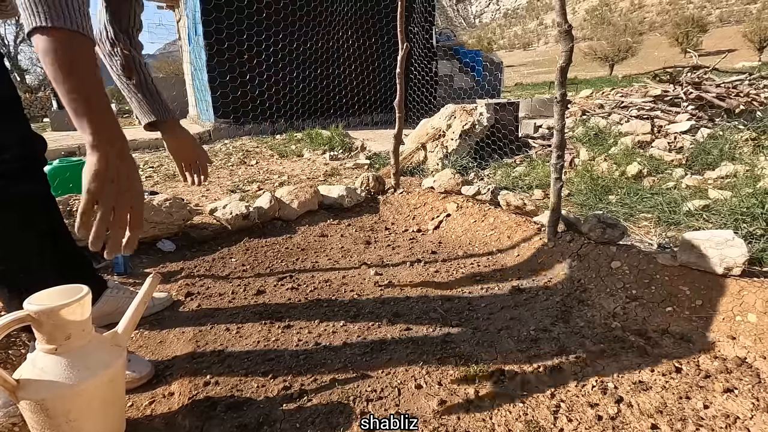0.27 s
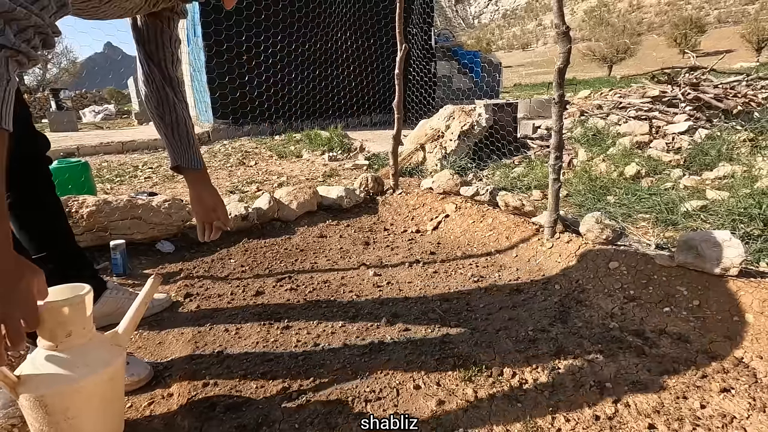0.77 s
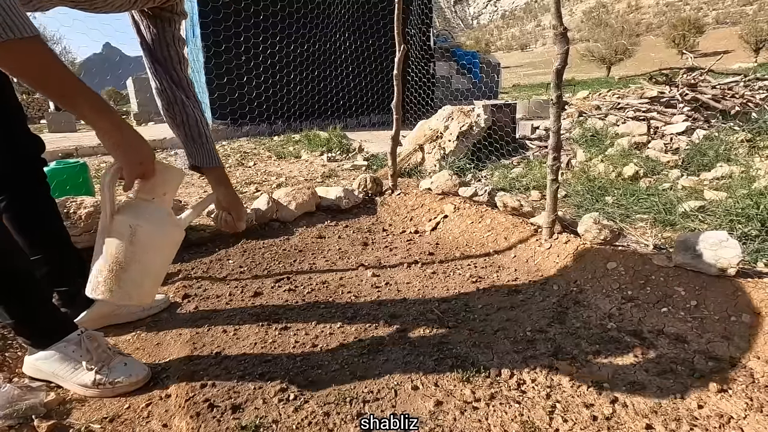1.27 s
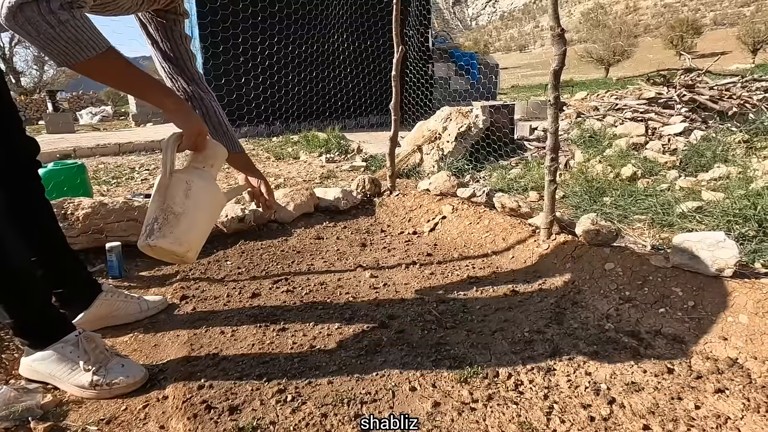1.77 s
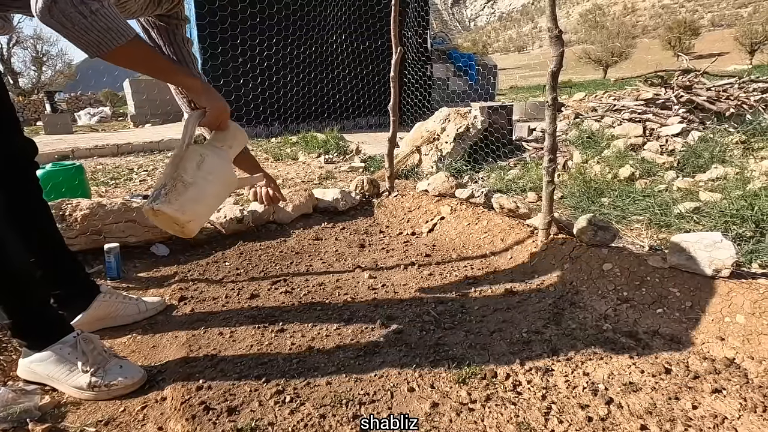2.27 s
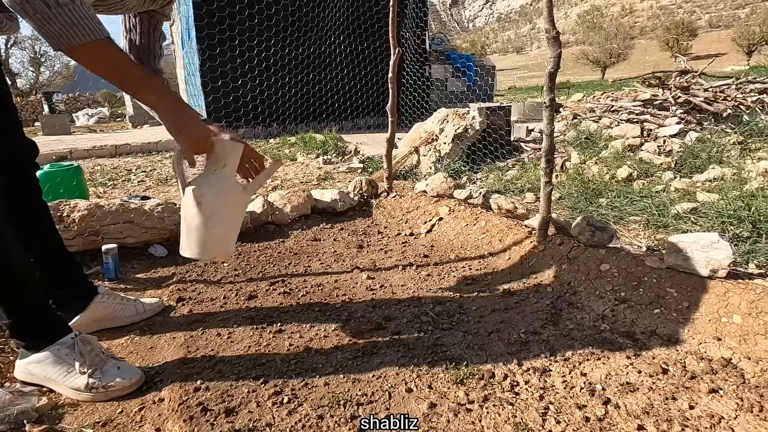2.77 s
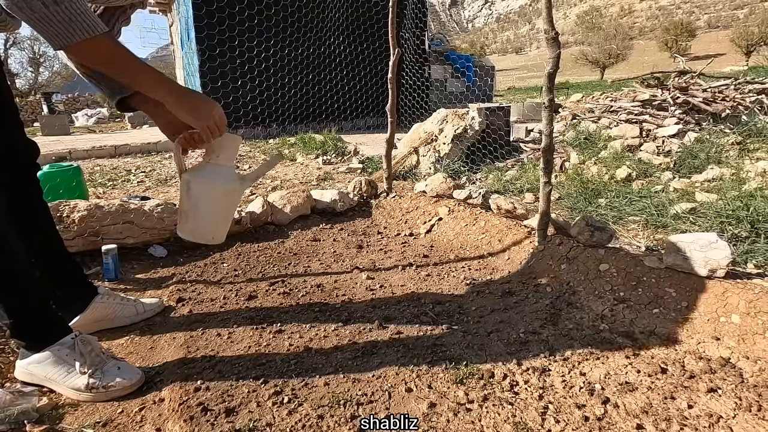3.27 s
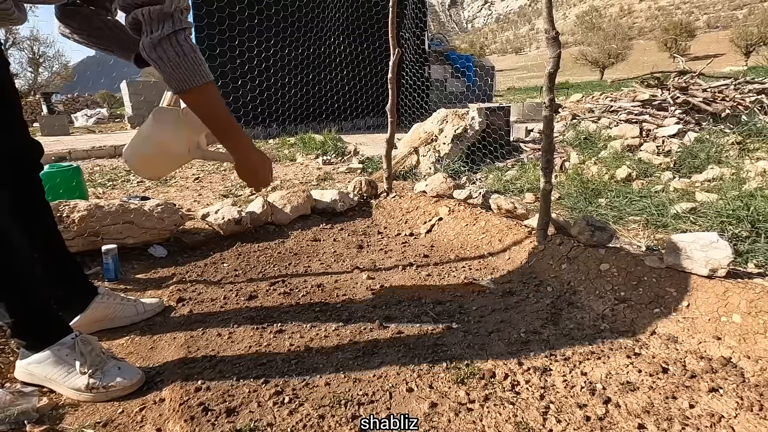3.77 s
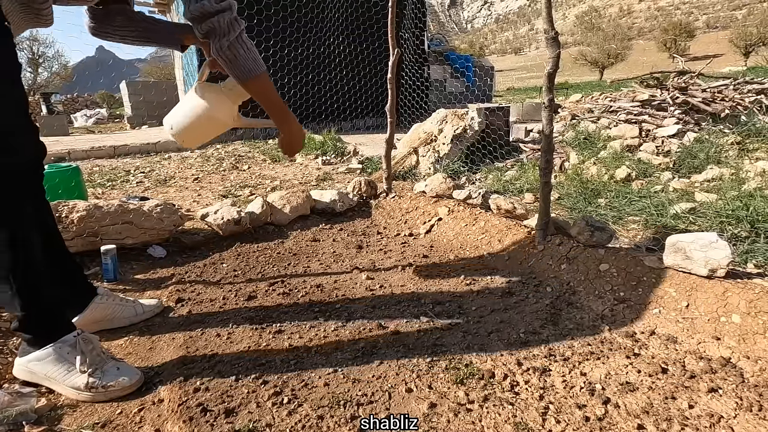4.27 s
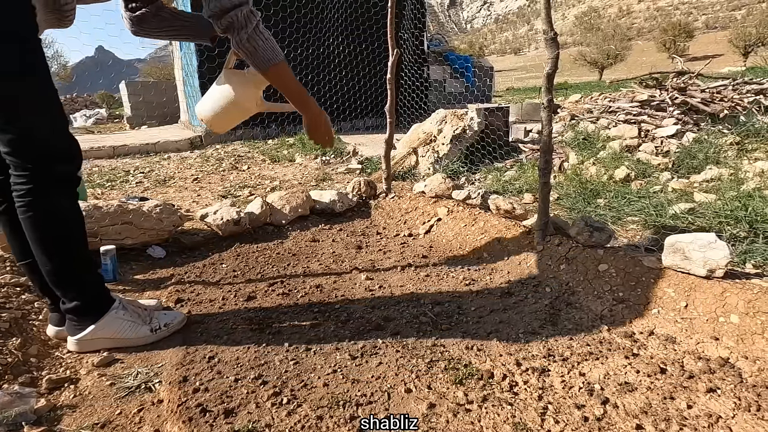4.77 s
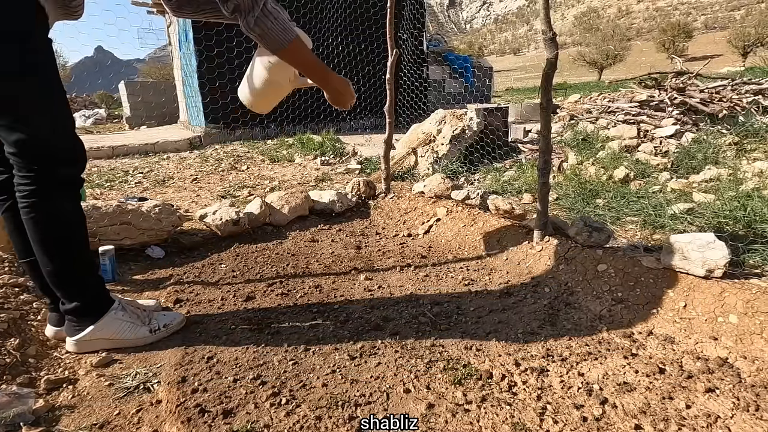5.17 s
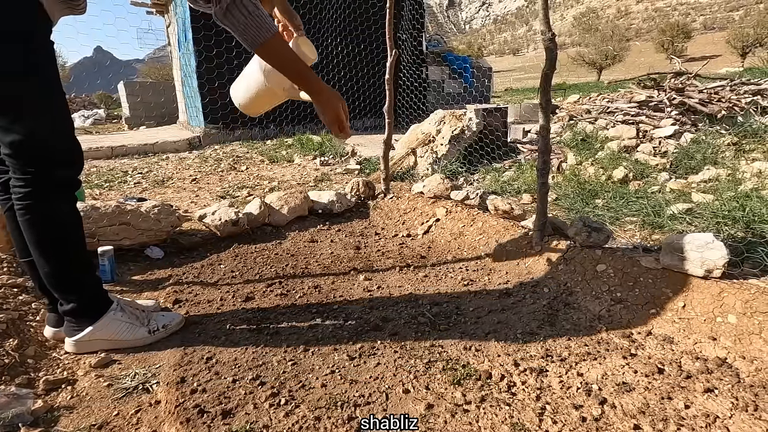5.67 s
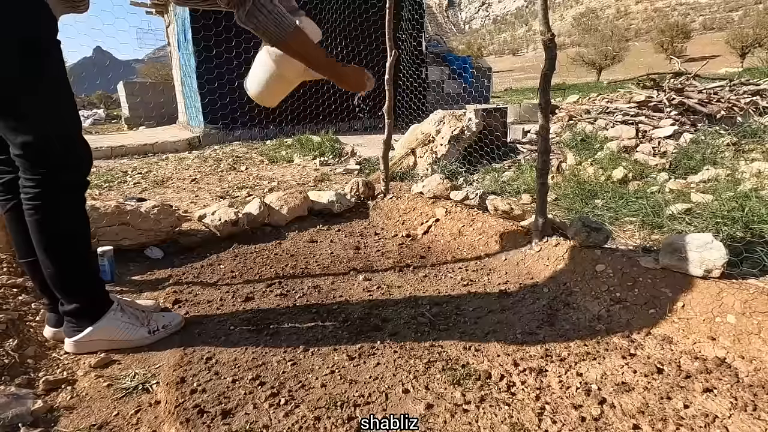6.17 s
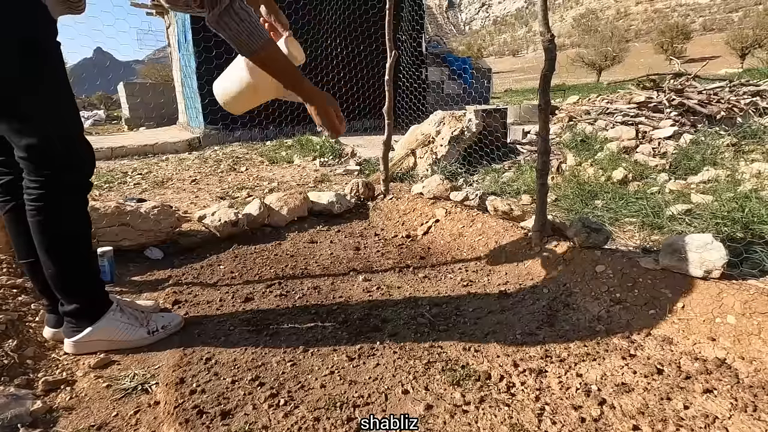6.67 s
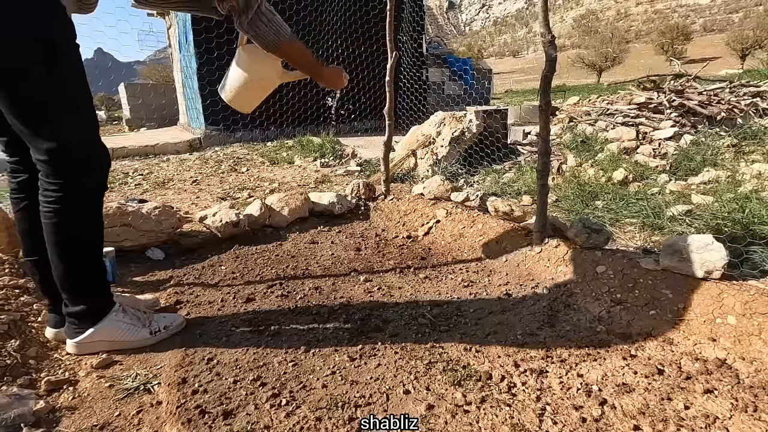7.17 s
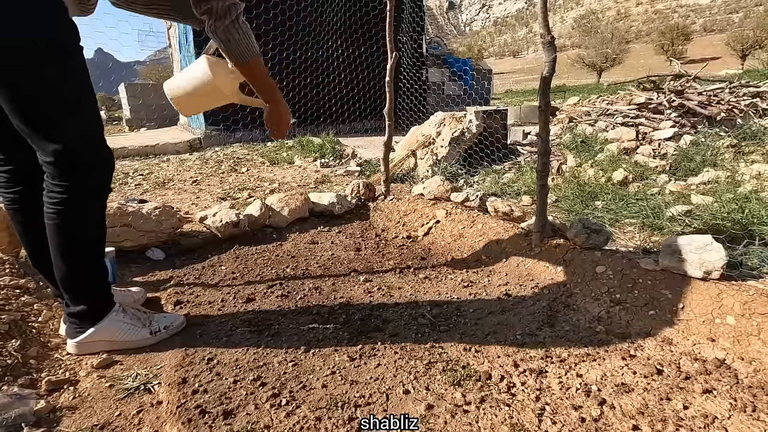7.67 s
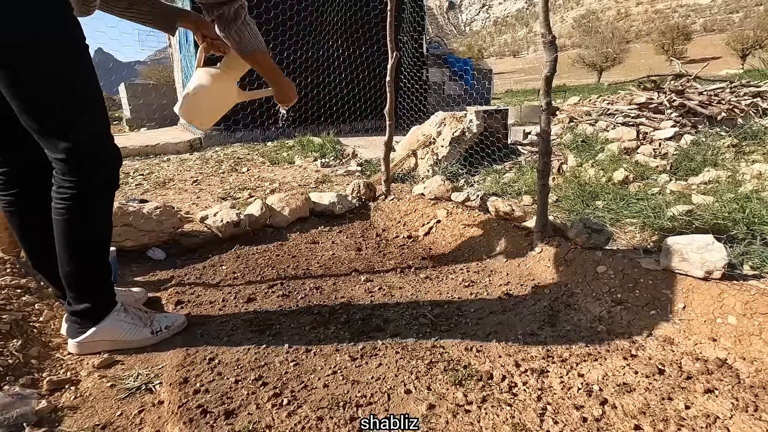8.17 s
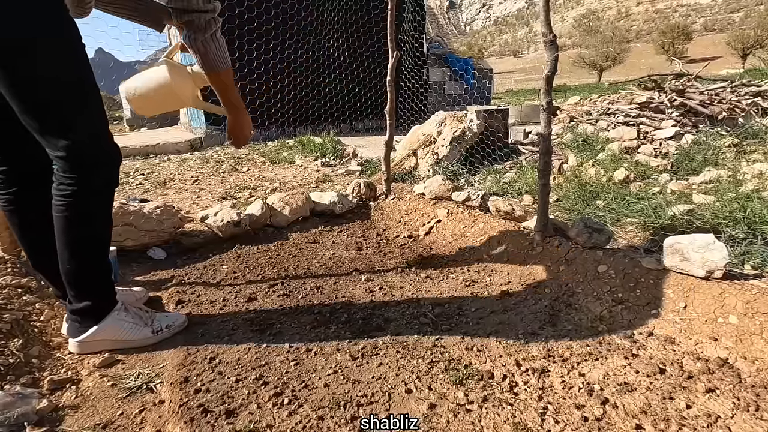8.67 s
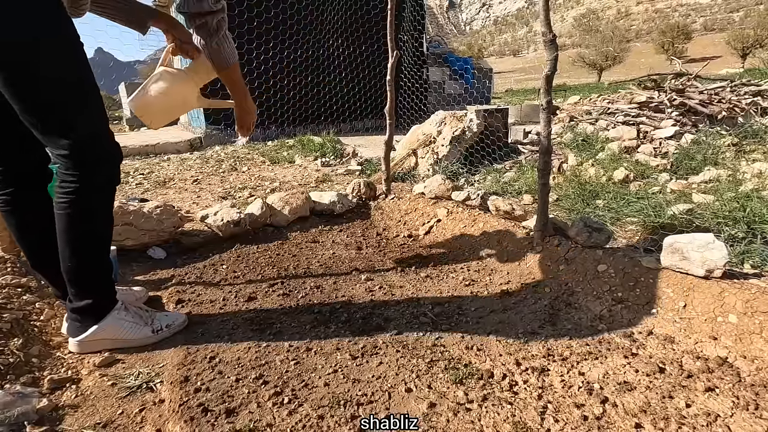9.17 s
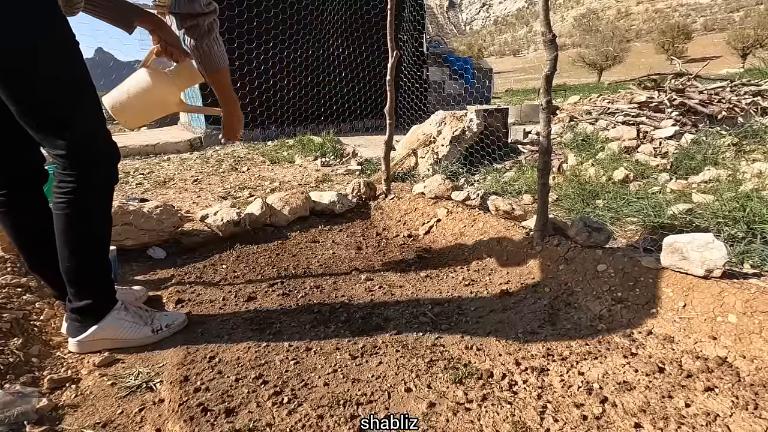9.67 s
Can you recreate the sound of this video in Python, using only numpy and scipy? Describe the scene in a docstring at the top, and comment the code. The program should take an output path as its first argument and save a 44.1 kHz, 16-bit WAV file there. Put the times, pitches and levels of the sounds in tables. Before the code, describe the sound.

Close outdoor take in a quiet yard. Cloth rustles as an arm reaches for a plastic watering can; a hollow knock and slosh come at three seconds, with a bright swish. Water then falls in uneven spurts on dry soil, pattering, pipping and crackling, with small gurgles in the spout. Low wind rumble buffets the microphone, stronger in the second half and slightly to the left.

```python
"""A quiet yard: a plastic watering can is picked up and tipped in spurts over dry, dug soil.
Droplets ring as bubbles, fat drops pip and crackle, and gurgles are swarms of rising tones.
Slaps and knocks are noise through the can's resonances; gulps are decaying hums of its air.
Sleeves rustle as uneven coloured noise, and gusts of wind rumble on the microphone."""
import sys
import numpy as np
from scipy import signal
from scipy.fft import rfft, irfft, next_fast_len
from scipy.io import wavfile
from scipy.ndimage import uniform_filter1d

SR = 44100
rng = np.random.default_rng(int(sys.argv[2]) if len(sys.argv) > 2 else 0)


def digitize_waveform(pressure):
    """Quantize a signal to 16-bit integers and store it at the path in sys.argv[1].

    Rows of a 2-D input are taken as channels; values are limited to [-1, 1].
    """
    field = np.atleast_2d(pressure).T
    bounded = np.clip(field, -1, 1)
    quanta = np.round(bounded * 32767).astype(np.int16)
    wavfile.write(sys.argv[1], SR, quanta)


N = 437913
TIME = np.arange(N) / SR


def from_db(db):
    """Amplitude gain is ten to the power of decibels over twenty."""
    return 10 ** (np.asarray(db) / 20)


def rms_one(x):
    """Dividing by the root mean square gives unit power."""
    return x / np.sqrt(np.mean(x ** 2) + 1e-20)


def peak_one(x):
    """Dividing by the largest excursion gives unit height."""
    return x / np.max(np.abs(x))


def decay(t, t60):
    """Exponential decay: the amplitude falls by 60 dB in t60 seconds."""
    return np.exp(-np.log(1000) * t / max(t60, 1e-4))


def burst(t, swell_s, t60):
    """Exponential build-up and decay: a quick swell that dies away."""
    return (1 - decay(t, swell_s)) * decay(t, t60)


def add(track, s, sound):
    """Superposition: mix a sound in at a time in seconds."""
    start = int(np.clip(round(s * SR), 0, N - 1))
    track[start:start + len(sound)] += sound[:N - start]


def drift(rate):
    """Twice low-passed noise: slow random wandering of unit power, with its corner at rate in Hz."""
    step = 40  # samples between the slow values
    r = np.exp(-2 * np.pi * rate * step / SR)
    settle = 2000
    white = rng.standard_normal(N // step + 2 + settle)
    slow = signal.lfilter([1], [1, -2 * r, r * r], white)[settle:]
    return np.interp(np.arange(N) / step, np.arange(len(slow)), rms_one(slow))


def strokes(rows, attack_s, release_s):
    """Powers add: each movement builds up, holds and dies away; short flicks start and stop sooner."""
    power = np.zeros(N)
    for s, length, db in rows:
        t = TIME[:int((length + release_s) * SR)]
        onset = 1 - decay(t, min(attack_s, 2 * length))
        ending = decay(np.maximum(t - length, 0), min(release_s, 5 * length))
        add(power, s, (from_db(db) * onset * ending) ** 2)
    return np.sqrt(power)


def at_hz(points, hz):
    """Interpolation on a log-frequency axis reads a spectrum."""
    knots, values = np.transpose(points)
    return np.interp(np.log(hz + 1), np.log(knots), values)


def colour(x, spectrum):
    """Folding the cepstrum forward gives the causal, minimum-phase filter of a spectrum."""
    size = 2 * next_fast_len(N // 2 + 4096, real=True)
    gain = from_db(at_hz(spectrum, np.fft.rfftfreq(size, 1 / SR)))
    cepstrum = irfft(np.log(gain))
    cepstrum[1:size // 2] *= 2
    cepstrum[size // 2 + 1:] = 0
    return irfft(rfft(x, size) * np.exp(rfft(cepstrum)))[..., :N]


def resonance(x, hz, width_hz):
    """A two-pole resonance rings at its pole frequency, with gain 1 on top."""
    r = np.exp(-np.pi * width_hz / SR)
    zeros = np.array([1, 0, -1]) * (1 - r * r) / 2
    poles = [1, -2 * r * np.cos(2 * np.pi * hz / SR), r * r]
    return signal.lfilter(zeros, poles, x + 1e-18)


def stereo(mid, side):
    """Interchannel correlation sets the share of side to mid: left and right differ most at the top."""
    # left-right likeness: frequency_hz, correlation
    likeness = [(60, .9), (250, .76), (700, .87), (2000, .86), (4500, .94), (8000, .84), (12000, .4)]
    width = [(hz, 10 * np.log10((1 - min(c, .99)) / (1 + c))) for hz, c in likeness]
    return mid + colour(side, width) * np.array([[1], [-1]])


def noise(spectrum):
    """Filtered white noise: coloured stereo noise of unit power."""
    mid, side = colour(rng.standard_normal((2, N)), spectrum)
    return rms_one(stereo(mid, side))


def pan(left_db):
    """Level difference between the ears: left over right, split evenly."""
    return from_db(np.array([[.5], [-.5]]) * left_db)


def scatter(x, near_db=-7.0, near_t60=0.044, far_db=-22.5, far_t60=0.23):
    """Diffuse reflection: clods and stones throw back a short smear, the wall a faint longer one."""
    t = TIME[:SR // 4]
    exponents = np.array([[1], [near_t60 / far_t60], [1]])
    near, far, wide = rng.standard_normal((3, len(t))) * decay(t, near_t60) ** exponents
    echo = from_db(near_db) * rms_one(near) + from_db(far_db) * rms_one(far)
    smears = np.array([echo, rms_one(wide)]) / np.sqrt(len(t))
    mid, side = signal.oaconvolve(x[None], smears, axes=1)[:, :N]
    return stereo(x + mid, side)


def yard():
    """Stationary background noise of fixed colour: the still yard."""
    # background spectrum: frequency_hz, relative level_db
    yard_colour = [(120, 1), (250, -7), (750, -23), (1200, -20.5), (3800, -35.5), (7500, -26), (15000, -28)]
    return from_db(-65.5) * noise(yard_colour)


def eddies(spectrum):
    """Turbulent noise divided by its own short-time level keeps an even strength."""
    x = noise(spectrum)
    return x / np.sqrt(uniform_filter1d(np.mean(x ** 2, axis=0), size=3500))


def gusts():
    """Powers add: each gust is a bell with long skirts on a wavering breeze; rumble, then buffeting."""
    # gusts on the microphone: crest_s, half_width_s, rumble level_db, buffeting level_db
    gust_rows = [(0.15, 0.04, -38, -54.5), (0.94, 0.052, -37.5, -49.5), (1.44, 0.019, -31, -47),
                 (1.89, 0.097, -32.5, -50), (2.079, 0.035, -31.5, -34.5), (2.72, 0.21, -41, -46),
                 (3.083, 0.048, -38.5, -33.5), (3.72, 0.081, -37, -49), (4.91, 0.019, -39, -40),
                 (5.48, 0.057, -26, -39), (5.708, 0.061, -25, -28), (6.139, 0.051, -28, -37.5),
                 (6.313, 0.056, -28, -26.5), (7.283, 0.074, -28.5, -37.5), (8.24, 0.077, -36, -42),
                 (8.476, 0.034, -23, -43.5), (9.28, 0.12, -35.5, -44), (9.529, 0.031, -21.5, -33)]
    rumble_db, buffet_db, waver_db = -46.5, -67.5, 2  # the air between gusts
    power = from_db(np.array([[rumble_db], [buffet_db]]) + waver_db * drift(9.7)) ** 2
    for s, width, *db in gust_rows:
        bell = 1 / np.cosh(np.minimum(np.abs(TIME - s) / width, 20))
        power = power + (from_db(db)[:, None] * bell) ** 2
    return np.sqrt(power)


def wind(lumpy_db=5.0, heave_db=2.0, left_db=-6.0):
    """Turbulence at the ports: slow eddies rumble, and faster, lumpy buffeting rises in sharp gusts."""
    # spectra of rumble and buffeting: frequency_hz, relative level_db
    wind_colour = [(25, 7.5), (40, 4), (65, -27.5), (110, -39), (300, -59), (600, -57.5), (4000, -100)]
    buffet_colour = [(25, 2.5), (65, 7), (110, -9.5), (170, -14), (300, -36.5), (600, -85.5)]
    rumble, buffet = gusts()
    lumps = rms_one(from_db(lumpy_db * np.minimum(drift(22.2), 2)))
    heaves = rms_one(from_db(heave_db * np.minimum(drift(12), 2)))
    low = heaves * rumble * eddies(wind_colour)
    high = lumps * buffet * eddies(buffet_colour)
    return (low + high) * pan(left_db)


def rustle(movement, spectrum, rough_db, gain_db, snags_per_s=600, snag_db=0.0, swell_db=2.0):
    """Friction: countless tiny contacts merge into an uneven hiss, with a rasp of snagging threads."""
    hiss, sizes = rng.standard_normal((2, N))
    snags = rms_one(sizes * (rng.random(N) < snags_per_s / SR))
    unevenness = from_db(rough_db * np.minimum(drift(80), 2) + swell_db * drift(22))
    contacts = (hiss + from_db(snag_db) * snags) * unevenness
    return from_db(gain_db) * movement * rms_one(colour(scatter(contacts, near_db=-12.0), spectrum))


def sleeve():
    """Rubbing friction of sleeve and hand as the arm reaches down, lifts the can and shifts its grip."""
    # rubs: start_s, length_s, level_db before the gain
    rubs = [(0.69, 0.06, -55), (0.752, 0.081, -50.5), (0.95, 0.064, -54), (1.18, 0.061, -63),
            (1.482, 0.019, -53.5), (1.873, 0.0079, -60.5), (3.05, 0.29, -65.5)]
    # spectrum: frequency_hz, relative level_db
    sleeve_colour = [(300, -7), (850, -16), (1400, -5.5), (3000, -4.5), (5300, -4), (8000, -8),
                     (14000, -11.5)]
    movement = strokes(rubs, attack_s=0.053, release_s=0.57)
    return rustle(movement, sleeve_colour, rough_db=0.5, gain_db=1.5)


def swish():
    """Friction noise of brighter colour: a hiss each time the arm swings forward or the can tips."""
    # swings: start_s, length_s, level_db before the gain
    swings = [(0.2, 0.013, -69.5), (1.59, 0.037, -74.5), (1.94, 0.096, -69.5), (2.18, 0.18, -69.5),
              (2.42, 0.15, -66), (3.245, 0.036, -48.5), (3.345, 0.14, -54), (3.54, 0.4, -63.5),
              (9.6, 0.14, -64.5)]
    # spectrum: frequency_hz, relative level_db
    swish_colour = [(300, -9), (800, -12.5), (1200, -9.5), (2800, -9.5), (4200, -4), (7300, 2.5),
                    (13000, -9.5)]
    movement = strokes(swings, attack_s=0.034, release_s=0.41)
    return rustle(movement, swish_colour, rough_db=1.5, gain_db=3.0)


def can_body(x):
    """Modal superposition: the half-full can's resonances, side by side."""
    # resonances of the can: frequency_hz, width_hz, level_db
    can_modes = [(459, 70, 4.5), (600, 52, 5.5), (678, 32, -1), (1027, 49, 0.5), (1152, 59, -3.5),
                 (1310, 180, -5), (1470, 28, -2), (1730, 95, -4), (1947, 240, -6), (2180, 25, 1.5),
                 (2870, 130, -11.5)]
    return sum(from_db(db) * resonance(x, hz, width) for hz, width, db in can_modes)


def knocks(contact_t60=0.0024, soften_hz=2600, chatter_db=-9.0, chatter_t60=.085, direct_db=-20.0):
    """Impact excitation: a sharp contact and a rattle of the grip leave the can's resonances ringing."""
    # the can knocked as the grip shifts: start_s, peak level_db
    knock_rows = [(0.029, -50.5), (0.428, -57.5), (2.975, -23), (3.034, -32), (3.109, -41.5),
                  (8.725, -54.5)]
    out, t = np.zeros(N), TIME[:SR // 4]
    soften = signal.butter(1, soften_hz, fs=SR, output="sos")
    for s, db in knock_rows:
        touch, chatter = rng.standard_normal((2, len(t)))
        rattle = chatter ** 3 / 10 * decay(t, chatter_t60)  # cubing leaves sparse spikes
        hit = touch * decay(t, contact_t60) + from_db(chatter_db) * rattle
        contact = signal.sosfilt(soften, hit)
        add(out, s, from_db(db) * peak_one(can_body(contact) + from_db(direct_db) * contact))
    return scatter(out, near_db=-22.0)


def gulps(swell_s=0.023, t60=0.52, gain_db=7.0, left_db=-2.0, usual_hz=200):
    """Air resonance: the air above the water hums like a bottle; smaller pockets bloop more briefly."""
    # gulps that set the air humming: start_s, level_db before swell and gain, pitch_hz
    gulp_rows = [(0.94, -56, 213.5), (2.495, -52, 191), (2.531, -43, 209.5), (2.974, -44, 227),
                 (3.037, -43, 225.5), (6.786, -57.5, 165), (6.899, -60, 202), (7.841, -60, 199.7),
                 (8.727, -52, 395), (9.214, -41, 194.2), (9.258, -46, 146.7)]
    out, t = np.zeros(N), TIME[:SR]
    for s, db, hz in gulp_rows:
        size = min(usual_hz / hz, 1) ** 2
        hum = np.sin(2 * np.pi * hz * t) * burst(t, swell_s * size, t60 * size)
        add(out, s, from_db(db + gain_db) * hum)
    return out * pan(left_db)


def slaps(wash_db=-5.0, spray_db=8.5, swell_s=0.0034, hard_db=-28.0, t60=0.089,
          wake_db=-17.0, wake_t60=0.21, gain_db=-0.5):
    """Forced resonance: water folds against the wall, a rush and its wake, with bright spray."""
    # water slapping the can's wall: start_s, level_db before the gain, centre_hz,
    # spray level_db relative to the slap before the spray gain
    slap_rows = [(1.491, -52, 1380, -11), (2.088, -50.5, 2300, -15), (2.526, -51.5, 870, -20),
                 (3.033, -33, 970, -6), (3.11, -42.5, 1360, -5), (3.158, -46.5, 1750, -27),
                 (3.406, -51.5, 370, -4), (3.652, -51.5, 1374, -5.5), (4.361, -40.5, 1570, -18),
                 (5.487, -53, 820, -8.5), (6.774, -39.5, 1000, -8.5), (7.532, -48, 770, -9.5),
                 (7.754, -51, 1010, -6), (8.173, -29.5, 1160, -32), (8.841, -53.5, 580, -27),
                 (9.182, -35, 2020, -21), (9.591, -45, 672, -13), (9.922, -45.5, 660, -25)]
    out, t = np.zeros(N), TIME[:SR // 3]
    treble = signal.butter(2, [2500, 9000], "band", fs=SR, output="sos")
    for s, db, hz, bright_db in slap_rows:
        swell = swell_s * np.sqrt(from_db(hard_db - db))  # gentle slaps build more slowly than hard ones
        shape = burst(t, swell, t60) + from_db(wake_db) * burst(t, swell, wake_t60)
        rush, spray = rng.standard_normal((2, len(t))) * shape
        pocket = signal.butter(2, [hz * .75, hz * 1.5], "band", fs=SR, output="sos")
        body = peak_one(signal.sosfilt(pocket, can_body(rush) + from_db(wash_db) * rush))
        bright = peak_one(signal.sosfilt(treble, spray))
        add(out, s, from_db(db + gain_db) * (body + from_db(bright_db + spray_db) * bright))
    return scatter(out, near_db=-18.0)


def bubbles(t60=0.022, rise_per_s=9.0, swell_s=0.006, swarm_db=-12.0, range_db=10.0,
            spread_s=0.045, octaves=0.9, froth_db=-8.0, count=22):
    """Bubble resonance: a big bubble rises in pitch amid a dense swarm of small ones and some froth."""
    # bubbles gurgling in the spout: start_s, level_db before the swell, pitch_hz
    bubble_rows = [(2.24, -50, 1960), (2.46, -50.5, 2130), (4.424, -43.5, 2260), (4.506, -42, 2330),
                   (4.604, -45, 2110), (4.694, -52, 2040), (4.744, -42.5, 2100), (4.882, -42, 3640),
                   (5.836, -47.5, 2630), (5.974, -49, 2700), (6.101, -51, 2850), (6.858, -43, 2340),
                   (6.894, -36.5, 3650), (6.912, -39.5, 2240), (6.938, -36, 2630), (7.94, -51.5, 4780)]
    out, t = np.zeros(N), TIME[:SR // 6]
    for s, db, hz in bubble_rows:
        froth = resonance(rng.standard_normal(len(t)) * burst(t, swell_s, 0.13), hz, hz)
        add(out, s, from_db(db + froth_db) * peak_one(froth))
        gurgle = [(0.0019, hz, 0)]  # the big bubble: delay_s, pitch_hz, relative level_db
        for when, size, weak in rng.random((count, 3)):
            pitch = hz * 2 ** (octaves * (size - .5))
            gurgle.append((spread_s * (2 * when - 1), pitch, swarm_db - weak * range_db))
        for late, pitch, size_db in gurgle:
            phase = 2 * np.pi * pitch * t * (1 + rise_per_s * t / 2)
            add(out, s + late, from_db(db + size_db) * np.sin(phase) * burst(t, swell_s, t60))
    return scatter(out, near_db=-16.0)


def splats(rise=0.16, crack_db=-2.0, crack_t60=0.01, crack_swell_s=0.0055, squelch_db=-24.5,
           squelch_periods=26.0, gain_db=-2.0):
    """Cavity and bubble resonance: a fat drop squelches upward, then a bubble pips in crackling spray."""
    # the fattest drops on the soil: impact_s, level_db before the gain, pitch_hz
    splat_rows = [(2.0883, -30, 5420), (2.6107, -34.5, 7800), (2.675, -28.5, 5300), (3.236, -27.5, 5120),
                  (4.565, -33.5, 8400), (4.7955, -36.5, 5700), (5.021, -22, 6450), (5.102, -34.5, 4650),
                  (5.127, -28, 2310), (5.1608, -31.5, 6570), (5.3577, -37, 6150), (5.833, -34.5, 6720),
                  (6.229, -37, 6460), (6.247, -30, 7800), (6.2638, -33, 7450), (6.348, -29.5, 6800),
                  (6.3989, -23.5, 6850), (6.4596, -25.5, 5000), (6.6901, -36, 4860), (6.7337, -37, 7760),
                  (7.1945, -34, 5700), (7.234, -29, 8180), (7.2815, -31, 5100), (7.556, -34.5, 6000),
                  (7.592, -37, 6500), (7.652, -22.5, 5750), (7.846, -35.5, 6040), (8.0904, -35.5, 6030),
                  (8.359, -40, 3050), (8.412, -31.5, 2270), (8.445, -29, 7240), (8.587, -26, 3780),
                  (8.626, -33, 7360), (9.041, -33.5, 6470), (9.273, -39.5, 3940), (9.429, -23, 5100),
                  (9.458, -27.5, 6800), (9.5272, -30, 2890), (9.5754, -32, 7500), (9.5938, -27.5, 5850),
                  (9.764, -33.5, 6320)]
    pip_swell_s = .0004
    out, t = np.zeros(N), TIME[:SR // 30]
    for s, db, hz in splat_rows:
        # the opening hollow climbs an octave and ends at the impact time
        squelch_s = squelch_periods / hz
        opening = np.linspace(0, 1, int(squelch_s * SR))
        hollow_hz = hz * 2 ** (opening - 1) / np.sqrt(2)
        squelch = opening * np.sin(2 * np.pi * np.cumsum(hollow_hz) / SR)
        add(out, s - squelch_s, from_db(db + gain_db + squelch_db) * squelch)
        age = t / pip_swell_s
        pitch = hz * (1 + rise * np.tanh(age / 2 - 2))
        pip = age ** 4 * np.exp(-age * 1.3) * np.sin(2 * np.pi * np.cumsum(pitch) / SR)
        spray = rng.standard_normal(len(t)) * burst(t, crack_swell_s, crack_t60)
        crack = resonance(resonance(spray, hz, hz), 1600, 7700)
        impact = .5 * peak_one(pip) + from_db(crack_db) * peak_one(crack)
        add(out, s, from_db(db + gain_db) * impact)
    return scatter(out)


def droplets(base_per_s, size_db, clump_db, min_cycles):
    """Bubble resonance: drops land in clumps, each ringing briefly at a slightly rising pitch."""
    rate = base_per_s * from_db(clump_db * np.minimum(drift(18), 2))
    at = np.flatnonzero(rng.random(N) < rate / SR)[:, None]
    tone, luck, wet = rng.random((len(at), 3)).T[:, :, None]
    hz = 1200 + 10000 * tone ** 1.5
    t60 = min_cycles * 5 ** wet / hz
    size = from_db(size_db * np.minimum(-np.log(1 - luck), 4)) / np.sqrt(t60)
    t = TIME[:SR // 100]
    rings = size * np.sin(2 * np.pi * hz * t * (1 + 10 * t)) * np.exp(-np.log(1000) * t / t60)
    return np.bincount((at + np.arange(len(t))).ravel(), rings.ravel(), N + len(t))[:N]


def pour():
    """Flow sets loudness: spurts reach the soil, and later a thin dribble runs on between them."""
    # spurts of water reaching the soil: start_s, length_s, level_db
    spurts = [(2.7, 0.54, -65.5), (4.38, 0.43, -61.5), (4.77, 0.48, -57.5), (5.38, 0.17, -66.5),
              (5.78, 0.35, -66), (6.21, 0.043, -52.5), (6.52, 0.038, -63), (6.82, 0.1, -55.5),
              (7.2, .11, -60.5), (7.52, 0.091, -59), (7.73, 0.62, -64), (8.41, 0.029, -51.5),
              (8.58, 0.15, -62), (8.88, 0.89, -69.5), (9.19, 0.45, -60.5), (9.38, 0.26, -54)]
    attack_s, release_s = 0.04, 0.2
    dribble_from_s, dribble_db = 5.8, -65.5  # once the can stays tipped
    dribble = from_db(dribble_db) * (1 - decay(np.maximum(TIME - dribble_from_s, 0), attack_s))
    return strokes(spurts, attack_s, release_s) + dribble


def patter(grain_db=1.0, fizz_db=-11.5, wash_db=-9.5, churn_db=-81.5, churn_lump_db=22.0):
    """Superposed bubbles: droplets over a wash of tiny ones; the soil fizzes, and the can churns."""
    # landing spectrum: frequency_hz, relative level_db
    patter_colour = [(300, 2.5), (1200, -14), (2400, -11.5), (3400, -12.5), (7500, 4), (15000, 2.5)]
    flow = pour()
    drops = droplets(base_per_s=450, size_db=7.0, clump_db=8.0, min_cycles=4.0)
    grain = rms_one(scatter(colour(drops, patter_colour)))
    tiny = droplets(base_per_s=1500, size_db=6.0, clump_db=5.0, min_cycles=13.0)
    wash = rms_one(scatter(resonance(tiny, 4700, 4500)))
    lumpy = rng.standard_normal(N) * from_db(churn_lump_db * np.minimum(drift(9.1), 1))
    churn = rms_one(resonance(can_body(lumpy), 830, 1100))
    fizz = noise(patter_colour)  # the soil drinking
    landing = from_db(grain_db) * grain + from_db(wash_db) * wash + from_db(fizz_db) * fizz
    return flow * landing + from_db(churn_db) * np.sqrt(rms_one(flow)) * churn


def scene():
    """Superposition: water, can and sleeves in front of a still yard, wind on top."""
    water = patter() + splats() + bubbles()
    can = (slaps() + knocks()) * pan(-1.1) + gulps()
    return water + can + sleeve() + swish() + yard() + wind()


def record(dry):
    """Band limiting: the microphone drops the deepest rumble and dulls the top."""
    # the microphone's treble shelf: frequency_hz, level_db
    mic_colour = [(7800, 2.5), (9000, -13), (12000, -14.5), (15000, -25.5)]
    rumble_cut = signal.butter(2, 18, "high", fs=SR, output="sos")
    x = signal.sosfilt(rumble_cut, colour(dry, mic_colour))
    top_cut = signal.ellip(8, .2, 70, 15000, fs=SR, output="sos")
    return signal.sosfilt(top_cut, x)


dry = scene()
out = record(dry)
digitize_waveform(out)
```